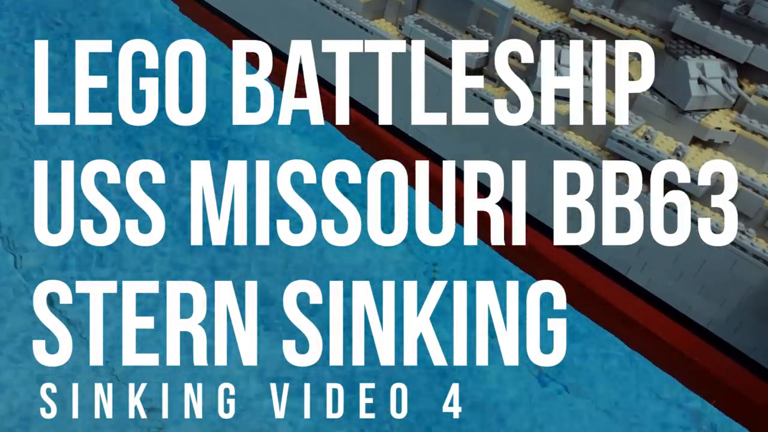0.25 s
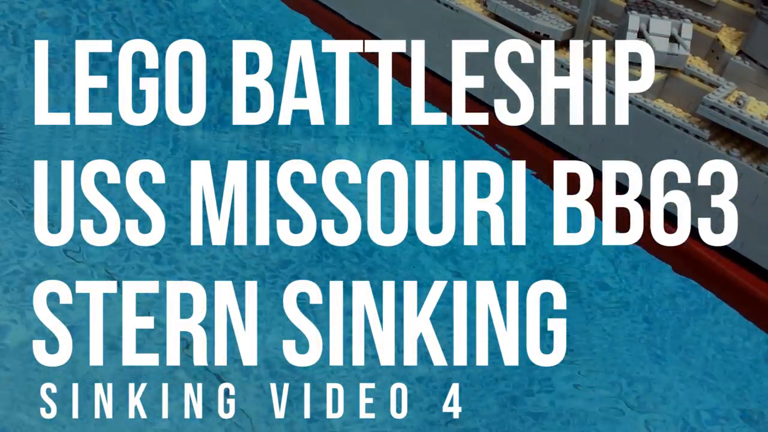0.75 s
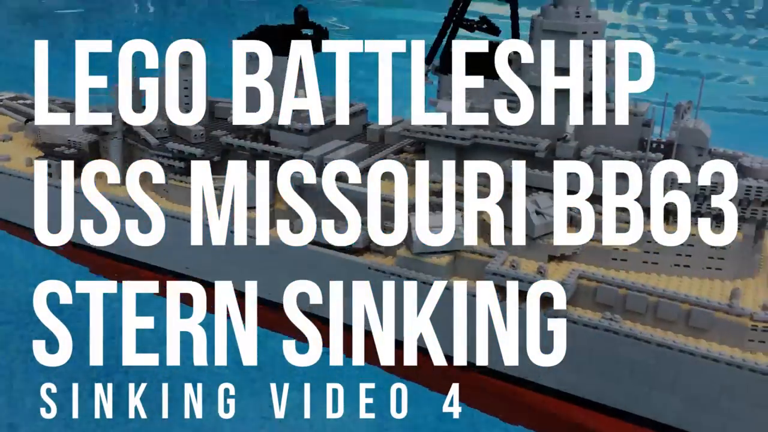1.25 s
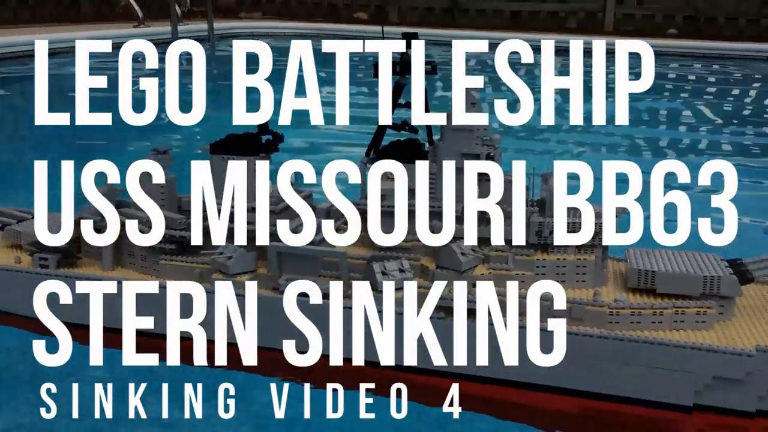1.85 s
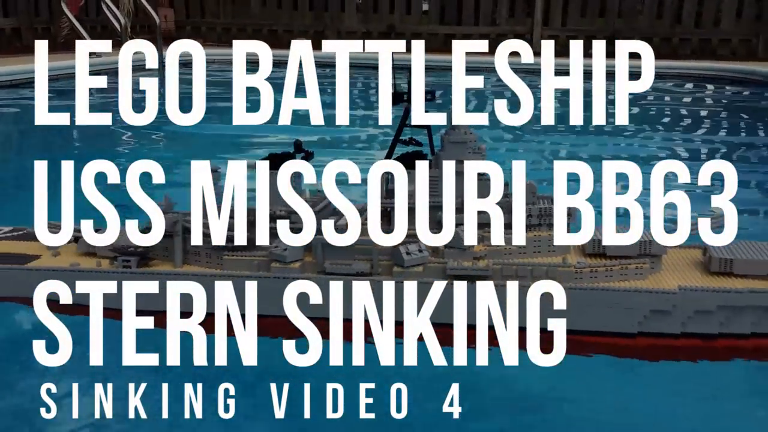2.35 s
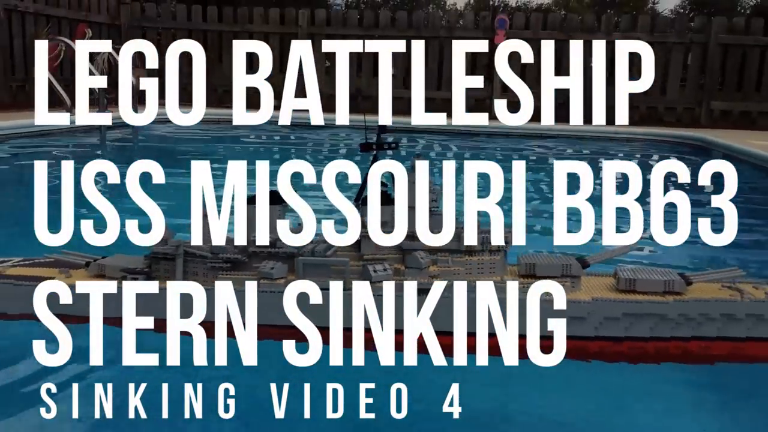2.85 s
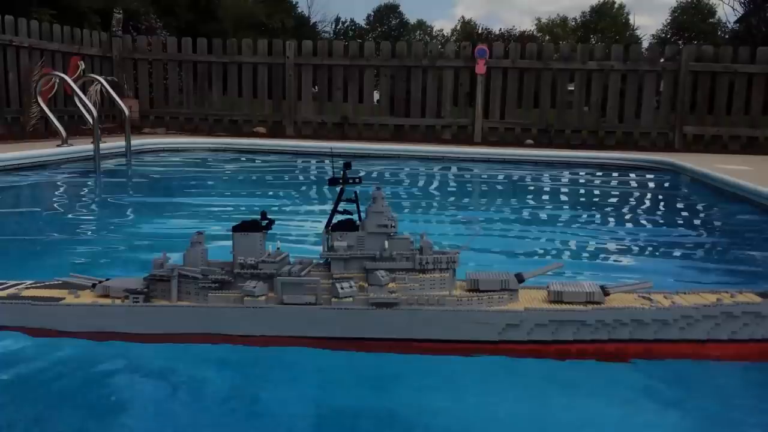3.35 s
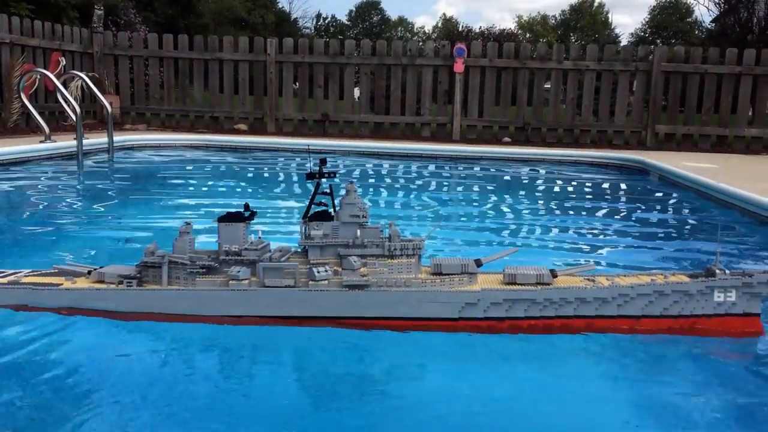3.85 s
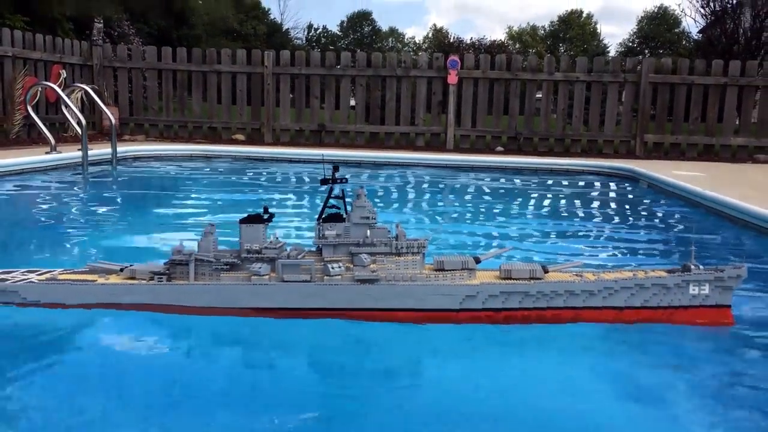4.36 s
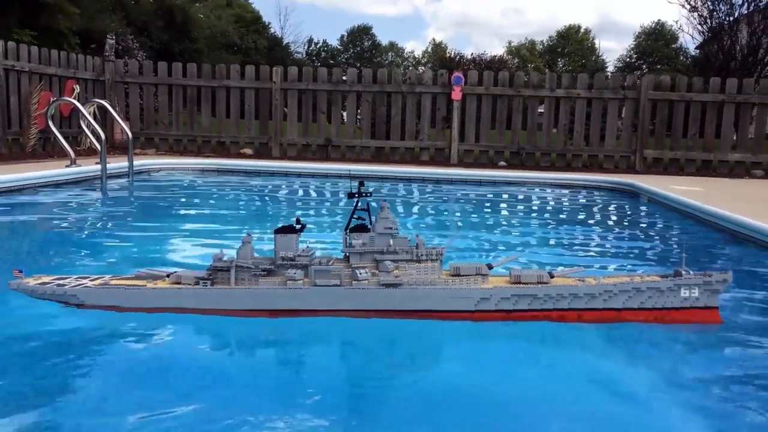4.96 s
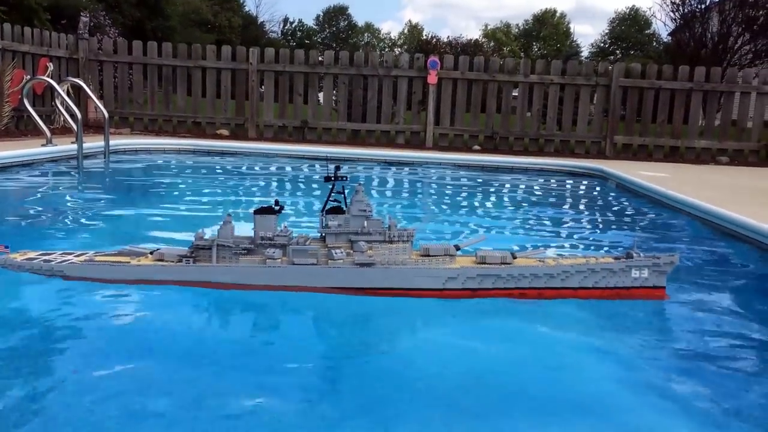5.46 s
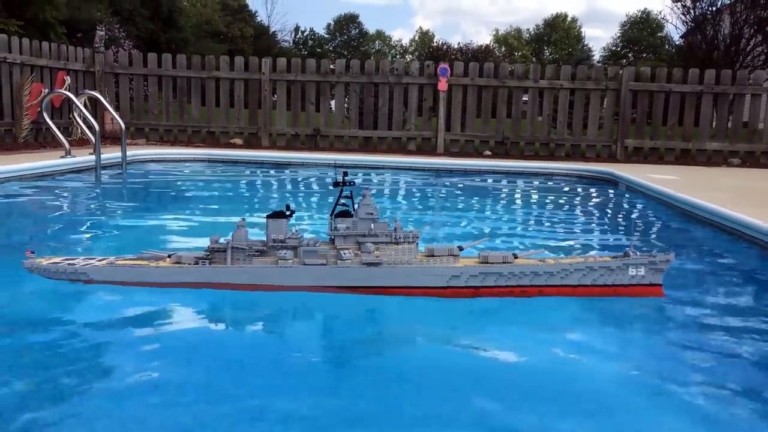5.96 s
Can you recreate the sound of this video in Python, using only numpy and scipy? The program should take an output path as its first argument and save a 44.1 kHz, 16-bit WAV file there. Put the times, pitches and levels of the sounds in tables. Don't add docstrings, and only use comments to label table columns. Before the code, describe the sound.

Outdoors at a garden pool, a low pump drone wavers over soft rumble and a faint steady insect hiss. A few small watery blips come first, then over a second of near calm. Water suddenly slops against a floating model hull in a dense cluster of bright plops, gurgles, little slaps and droplet ticks. It thins into separate drips, with a last small plop near the end. The microphone is close to the water, with little echo.

```python
import sys
import numpy as np
from scipy import signal
from scipy.fft import rfft, irfft, next_fast_len
from scipy.io import wavfile
from scipy.ndimage import map_coordinates

SR = 44100
rng = np.random.default_rng(int(sys.argv[2]) if len(sys.argv) > 2 else 0)


def digitize_waveform(pressure):
    field = np.atleast_2d(pressure).T
    bounded = np.clip(field, -1, 1)
    quanta = np.round(bounded * 32767).astype(np.int16)
    wavfile.write(sys.argv[1], SR, quanta)


def to_linear_factor(level_db):
    exponent = np.asarray(level_db, float) / 20
    return 10 ** exponent


N = 273861

# frequency_hz, density_db
RUMBLE_SPECTRUM = [(15, -70), (25, -24), (50, -10.5), (78, -3), (130, -6), (200, -10.5), (280, -21.5),
                   (420, -30.5), (800, -34.5), (1450, -37), (2300, -43), (2900, -54), (4000, -106)]
# frequency_hz, density_db
INSECT_SPECTRUM = [(1710, -39.5), (2900, -11), (3660, -6.5), (4210, -6.5), (4610, -4), (5190, -5),
                   (6820, -0.5), (11400, -23), (14500, -27.5), (15500, -21)]
# time_s, level_db
PUMP_LEVEL = [(0.0, -48), (0.34, -55), (1.03, -53), (1.38, -62.5), (1.72, -46.5), (2.12, -58),
              (2.35, -47.5), (2.76, -48), (3.1, -47.5), (3.8, -59), (4.48, -56.5), (4.83, -47),
              (5.18, -45.5), (5.52, -51.5), (5.86, -48), (6.21, -53)]
# peak_s, small_bubbles_db, spray_db
SLOSHES = [(0.18, -71, -76), (0.3, -67.5, -82), (2.08, -70.5, -75), (2.29, -56.5, -86), (2.46, -55.5, -72),
           (2.56, -49, -67), (2.63, -50.5, -69), (2.71, -55.5, -66), (2.85, -52.5, -65), (2.98, -63, -71),
           (3.08, -61, -68), (3.19, -61, -74), (3.26, -63, -64), (3.5, -65, -77), (3.74, -60, -76),
           (3.84, -68, -70), (4.8, -72, -78)]
# frequency_hz, level_db
FIZZ_SPECTRUM = [(350, -17), (600, -13), (1000, -4.5), (1400, -0.5), (2300, -3), (2900, -13.5), (4200, -10),
                 (6000, -22.5)]
# start_s, peak_db
SPECKS = [(0.5467, -55), (0.7382, -57), (0.7612, -58), (0.8295, -62), (0.9133, -56), (0.9443, -56),
          (2.0213, -59), (2.0264, -59), (2.0692, -57), (2.1046, -57), (2.1734, -52), (2.2054, -60),
          (2.2914, -58), (2.3074, -58), (2.4209, -55), (2.4374, -54), (2.5147, -50), (2.553, -54),
          (2.5686, -52), (2.592, -53), (2.6126, -52), (2.643, -54), (2.716, -54), (2.731, -54),
          (2.7501, -53), (2.77, -55), (2.826, -49), (2.9174, -50), (3.0505, -55), (3.0694, -54),
          (3.1587, -55), (3.2261, -52), (3.2664, -56), (3.3044, -57), (3.3263, -54), (3.3493, -59),
          (3.4271, -58), (3.5094, -60), (3.52, -62), (3.6511, -56), (3.7209, -53), (3.7294, -54),
          (3.7753, -49), (3.8014, -58), (3.8192, -57), (3.8771, -54), (3.8864, -57), (3.902, -59),
          (4.1729, -60), (4.2278, -56), (4.4737, -62), (4.558, -54), (4.8244, -60), (4.9337, -62),
          (5.034, -58)]
# start_s, peak_db, pitch_hz
PIPS = [(4.805, -53, 4300), (4.822, -54, 4050), (3.195, -51, 4200), (0.548, -52, 4000), (0.74, -56, 3900),
        (0.32, -51, 4000), (2.174, -50, 4200), (2.294, -46, 6670), (2.306, -49, 3670), (2.381, -50, 4900),
        (2.434, -47, 4300), (2.526, -39, 6060), (2.618, -47, 4570), (2.66, -56, 4300), (2.671, -41, 5100),
        (2.746, -49, 3600), (2.836, -43, 3800), (2.8823, -45, 5260), (3.009, -48, 4000), (3.051, -50, 3800),
        (3.134, -51, 3740), (3.149, -48, 4400), (3.271, -48, 4400), (3.29, -48, 5800), (3.304, -56, 4200),
        (3.323, -54, 4100), (3.7294, -44, 5430), (3.802, -49, 4930), (3.88, -48, 6640)]
# start_s, peak_db, lower_half_re_top_db
TICKS = [(0.199, -46.5, -8), (2.074, -48, -3), (2.165, -49, -12), (2.2987, -55, 5), (2.3622, -51, 7),
         (2.526, -49.5, 4), (2.5455, -51, 5), (2.621, -40.5, 1), (2.6287, -32.5, -7.5), (2.6703, -52, 3),
         (2.6835, -42, -2), (2.6952, -38, -6), (2.8368, -47, 4), (2.8443, -36, -10), (2.8524, -36, -20),
         (2.883, -41, -4), (2.9047, -28, -12), (2.9312, -45, -8), (2.9903, -47, -5), (3.1138, -49, -5),
         (3.2595, -54, 3), (3.297, -47, -3), (3.6034, -46.5, -9), (3.709, -54.5, 8.5), (3.754, -41.5, -6),
         (3.7853, -39, -11), (4.4972, -48, -15), (4.5662, -48, -8), (5.0446, -46.5, -3), (5.3776, -47, -6)]
# start_s, peak_db
SLAPS = [(0.177, -49), (0.253, -47), (0.291, -50), (0.547, -50), (0.739, -49), (2.142, -49), (2.248, -48),
         (2.42, -44), (2.456, -43), (2.52, -42), (2.542, -33), (2.581, -35), (2.602, -36), (2.616, -36),
         (2.626, -38), (2.644, -37), (2.696, -31), (2.745, -46), (2.767, -39), (3.061, -39), (3.133, -43),
         (3.196, -38), (3.739, -39), (3.751, -36), (3.856, -46)]
# start_s, peak_db, from_hz, to_hz, length_ms
FILLING = [
    (0.15, -58, 650, 1050, 48),
    (0.24, -57, 590, 1000, 54),
    (0.173, -57, 1450, 2300, 20),
    (0.292, -57, 1900, 2550, 12),
    (2.195, -60, 680, 1100, 90),
    (2.652, -36.5, 880, 2000, 31),
    (2.568, -36, 450, 850, 22),
    (2.548, -43, 950, 1350, 26),
    (2.59, -46, 570, 600, 70),
    (3.362, -60, 1600, 2400, 14),
]
# start_s, peak_db, pitch_hz, t60_ms
RISING = [(3.2, -38, 1320, 45), (3.298, -51, 1600, 25), (3.27, -53, 1480, 60), (2.612, -41, 1950, 40),
          (2.625, -43, 1750, 40), (0.1915, -47, 1330, 70), (0.205, -56, 1380, 90), (2.732, -48, 1250, 30),
          (2.925, -50, 1120, 80), (0.1181, -52, 636, 170), (0.1985, -48, 548, 240),
          (2.193, -41.5, 1710, 30), (2.269, -49, 1220, 56), (2.2872, -38, 1330, 9),
          (2.513, -47.5, 478, 260), (2.568, -40, 4350, 18), (2.569, -33, 1344, 73), (2.569, -30, 1500, 10),
          (2.6172, -29, 1470, 6.5), (2.768, -43, 2000, 12), (2.8166, -46, 1770, 22),
          (2.8768, -39, 1560, 53), (3.1074, -55, 606, 90), (3.112, -54, 860, 70), (3.3723, -52, 1140, 110),
          (3.399, -48.5, 950, 84), (3.527, -55, 1840, 21), (3.5287, -52.5, 980, 65), (3.588, -57, 1580, 56),
          (3.698, -53, 1124, 100), (3.7863, -37.5, 2180, 7.7), (3.841, -54, 2350, 45),
          (3.856, -49.5, 1286, 64), (3.8778, -38, 1330, 4.5), (4.7718, -49, 1300, 47),
          (4.824, -55, 990, 52), (4.9352, -58, 1750, 53), (5.0451, -39, 1900, 5.5)]
# start_s, peak_db, pitch_hz, t60_ms
SINKING = [(0.0, -43, 1580, 17), (0.097, -51, 1180, 29), (0.5471, -45, 3300, 7), (0.7395, -54, 2000, 12),
           (2.069, -49, 3930, 7), (2.161, -46, 1440, 44), (2.1743, -29, 1450, 5.2), (2.5712, -38, 580, 17),
           (2.5886, -44, 640, 60), (2.7039, -43.5, 530, 180), (2.7302, -39.5, 4350, 11),
           (2.7672, -43, 768, 63), (2.852, -33.5, 455, 125), (2.965, -50, 437, 89),
           (3.022, -36.5, 1926, 50), (3.2284, -38.5, 3980, 14), (3.244, -56.5, 510, 260),
           (3.2564, -44.5, 2220, 30), (3.2595, -42, 4200, 16), (3.3761, -51, 4250, 14),
           (3.3763, -47, 2680, 35), (3.4276, -38.5, 880, 51), (3.7098, -43, 4370, 12),
           (3.72, -46, 2240, 26), (3.8224, -51, 2010, 11), (4.446, -52.5, 1730, 27),
           (4.7644, -51.5, 950, 67), (4.832, -52, 1380, 45)]
# start_s, peak_db, pitch_hz, t60_ms
STEADY = [(0.004, -62, 1410, 54), (0.095, -56, 1520, 34), (0.5475, -59, 1750, 9), (0.548, -54.5, 2440, 14),
          (0.7396, -56, 2930, 24), (1.962, -59.5, 1460, 98), (2.194, -54.5, 843, 130),
          (2.2947, -44, 2400, 30), (2.345, -44, 1980, 40), (2.196, -51, 1300, 45), (2.278, -48, 1700, 45),
          (2.455, -45, 1340, 30), (2.66, -39, 2000, 25), (2.71, -42, 1930, 25), (2.858, -48, 1170, 45),
          (2.862, -42, 1450, 40), (3.13, -49.5, 1006, 70), (3.57, -59.5, 515, 120),
          (3.605, -56.5, 562, 120), (3.76, -52, 982, 110), (3.795, -53, 930, 62), (3.715, -57, 714, 83),
          (2.585, -37, 1450, 35), (2.63, -45, 1196, 70), (2.582, -41, 2400, 30), (2.421, -48.5, 566, 120),
          (2.453, -49, 760, 69), (2.891, -42, 2360, 42), (2.9035, -46, 2440, 36), (2.962, -54, 723, 99),
          (2.9913, -40, 2330, 25), (3.076, -46, 270, 68), (3.133, -35.5, 1520, 24), (3.7399, -39, 1090, 43),
          (3.748, -50, 690, 110), (3.8002, -53, 1910, 32), (3.8282, -51, 1790, 34), (3.8776, -39, 551, 205),
          (3.921, -54, 2070, 21), (4.7686, -46.5, 2250, 19), (4.823, -54, 1890, 35), (4.795, -51, 4130, 15),
          (5.043, -49, 3800, 10), (5.0454, -35.5, 1195, 73), (5.1544, -45, 1917, 44)]
# start_s, peak_db, pitch_hz, t60_ms, glide_octaves_per_s
SWEEPS = [(0.115, -50, 620, 15, 79), (0.175, -54, 720, 40, 5), (0.254, -52, 1060, 48, -44),
          (0.262, -57, 640, 68, 19), (0.292, -61, 847, 190, 8.5), (2.136, -62, 986, 450, 17.5),
          (2.285, -40, 1100, 110, 5), (2.325, -47, 1330, 60, 14), (2.344, -37, 1440, 70, 8),
          (2.362, -46, 1580, 60, 8), (2.543, -36, 1166, 43, -16), (2.5807, -36, 1950, 35, 12),
          (2.512, -48, 600, 98, 48), (2.7, -39, 1250, 67, 2.5), (2.602, -33.5, 1500, 68, -9),
          (2.6049, -30, 1970, 19, -74), (2.6695, -27.5, 2200, 30, 21.5), (2.68, -44, 2560, 40, 20),
          (2.694, -38, 2750, 30, -10), (2.878, -40, 1600, 30, 5), (3.058, -43, 380, 40, 10),
          (2.6976, -25.5, 1610, 15, -74), (2.8229, -41, 1810, 31, 43), (2.83, -37, 2064, 42, -20),
          (2.8396, -37.5, 2040, 60, -17), (2.8443, -32, 1250, 26, -83), (3.061, -40.5, 518, 66, -47),
          (3.0644, -43, 1190, 33, -42), (3.063, -44, 553, 68, 74.5), (3.073, -43, 1240, 30, 20),
          (2.177, -42, 1190, 47, 22), (3.092, -56, 515, 120, 18), (2.322, -51, 2300, 40, 15),
          (3.222, -44.5, 5200, 28, -45)]
# start_s, peak_db, pitch_hz
TRICKLE = [(0.121, -58, 1210), (0.124, -53, 2700), (0.2985, -57, 2200), (1.103, -60.5, 548),
           (1.162, -61, 704), (2.097, -58, 2520), (2.133, -55, 2350), (2.131, -56, 1020),
           (2.725, -43, 4820), (2.8, -44, 4120), (2.99, -47, 1310), (3.173, -50, 3900), (3.255, -55, 1400),
           (3.289, -51, 1490), (3.32, -58, 1360), (3.365, -55, 2850), (3.445, -54, 2540),
           (3.455, -52.5, 1240), (3.512, -58, 1640), (3.5505, -58, 2040), (3.63, -58, 1690),
           (3.664, -59, 1900), (3.713, -55, 2400), (3.718, -53, 890), (3.77, -57, 1050), (4.847, -60, 1850),
           (4.9478, -56, 2490), (5.4, -60, 1600), (2.05, -61, 1000), (2.063, -62, 1650), (2.08, -59, 2150),
           (2.086, -58, 1150), (2.4, -53, 1250), (3.015, -54, 880), (3.235, -54, 1460), (3.81, -58, 1440),
           (3.44, -57, 1900), (4.75, -61, 1850), (4.89, -62, 1900), (5.315, -61, 2500), (0.32, -59, 895),
           (0.335, -61, 1050)]
# start_s, peak_db, pitch_hz, glide_octaves_per_s
SWELLS = [(0.067, -49, 2290, -55), (0.1913, -53, 1015, -32), (0.2535, -49.5, 1920, 37),
          (0.2974, -51.5, 1190, -24), (2.216, -37.5, 1820, -43), (2.312, -39, 1170, 20),
          (2.314, -47, 1800, 15), (2.384, -43.5, 2790, -13), (2.424, -38.5, 1640, 5),
          (2.432, -35, 1850, 35), (2.4698, -26, 1670, -69), (2.527, -33, 1700, 4), (2.541, -33, 2114, 20),
          (2.548, -41, 3700, 25), (2.633, -42, 1420, -39), (2.817, -36.5, 1400, -21),
          (2.9129, -38.5, 1400, 24), (3.1975, -32.5, 1410, -9), (3.191, -43, 1600, -10),
          (3.205, -46, 1950, 0.5), (3.263, -43.5, 2480, 25), (3.2718, -42, 2520, -22),
          (3.356, -51, 1360, 29), (3.478, -36, 2365, 7), (3.7476, -39, 2080, -104),
          (5.0415, -43.5, 2320, 36)]

DRONE_HZ, DRONE_WIDTH_HZ = 103.9, 5.04
BEAT_HZ, BEAT_DEPTH, BEAT_PEAK_S = 4.8, 0.31, 2.35
GATHER_DB_PER_S, SETTLE_DB_PER_S = 137, 102
THROW_DB_PER_S, FALL_DB_PER_S = 150, 108
FILL_CURVE = 1.5
RISE_OCTAVES, SAG_OCTAVES = 0.47, -0.49
ONSET_CYCLES = 0.75
SWEEP_ONSET_SHARE = 0.011
SWELL_ONSET_S = 0.004
PIP_CYCLES, SWELL_CYCLES, TRICKLE_CYCLES = 27, 30, 53
WOBBLE_DB, WOBBLE_PER_S = 1.2, 140


def rms_one(x):
    return x / np.sqrt(np.mean(x ** 2) + 1e-20)


def at_hz(points, hz):
    points_hz, points_db = np.transpose(points)
    return np.interp(np.log(hz), np.log(points_hz), points_db)


def drift(rate_per_s):
    steps = rng.standard_normal(int(rate_per_s * N / SR) + 3)
    position = np.arange(N) * rate_per_s / SR
    return rms_one(map_coordinates(steps, [position], order=3))


def coloured(spectrum):
    size = next_fast_len(N)
    hz = np.arange(size // 2 + 1) * SR / size + 1
    white = rfft(rng.standard_normal(size))
    return rms_one(irfft(white * to_linear_factor(at_hz(spectrum, hz)), size)[:N])


def add(out, start_s, sound):
    i = round(start_s * SR)
    out[i:i + len(sound)] += sound[:N - i]


def stirred(peaks, up_db_per_s, down_db_per_s):
    t = np.arange(N) / SR
    power = np.zeros(N)
    for peak_s, db in peaks:
        below_peak_db = np.maximum(up_db_per_s * (peak_s - t), down_db_per_s * (t - peak_s))
        power += to_linear_factor(db - below_peak_db) ** 2
    return 10 * np.log10(power + 1e-12)


def crack(low_hz, high_hz, t60_s):
    t = np.arange(round(0.012 * SR)) / SR
    burst = rng.standard_normal(len(t)) * to_linear_factor(-60 * t / t60_s)
    band = signal.butter(2, [low_hz, high_hz], "band", fs=SR, output="sos")
    burst = signal.sosfilt(band, burst)
    return burst / np.abs(burst).max()


def bubble(hz, glide, t60_s, rise_s):
    t = np.arange(round(t60_s * SR) + 64) / SR
    glide_end_s = t60_s * 3 / np.log(1000)
    pitch = hz * 2 ** (glide * np.minimum(t, glide_end_s))
    shape = (1 - np.exp(-t / rise_s)) * to_linear_factor(-60 * t / t60_s)
    return shape / shape.max() * np.sin(2 * np.pi * np.cumsum(pitch) / SR)


def rumble():
    gusts_db = 0.6 * drift(4)
    return to_linear_factor(-50 + gusts_db) * coloured(RUMBLE_SPECTRUM)


def insects():
    fading_db = np.linspace(-59, -60, N)
    return to_linear_factor(fading_db + 0.43 * drift(7.2)) * coloured(INSECT_SPECTRUM)


def pump():
    t = np.arange(N) / SR
    level_db = np.interp(t, *np.transpose(PUMP_LEVEL))
    wander_hz = DRONE_WIDTH_HZ * 0.3025 * drift(6)
    tone = np.sqrt(2) * np.sin(2 * np.pi * np.cumsum(DRONE_HZ + wander_hz) / SR)
    beat = 1 + BEAT_DEPTH * np.cos(2 * np.pi * BEAT_HZ * (t - BEAT_PEAK_S))
    return to_linear_factor(level_db - 1.0 + 1.4 * drift(9)) * beat * tone


def reflections(x):
    t = np.arange(round(0.1 * SR)) / SR
    tail = rng.standard_normal(len(t)) * to_linear_factor(-60 * t / 0.08) * np.clip(t / 0.004, 0, 1)
    band = signal.butter(1, [900, 5000], "band", fs=SR, output="sos")
    tail = signal.sosfilt(band, tail)
    return to_linear_factor(-16) * signal.fftconvolve(x, tail / np.linalg.norm(tail))[:N]


def spray(level_db, count=2600):
    out = np.zeros(N)
    for when, size, pitch in rng.random((count, 3)):
        hz = 4200 * 3.4 ** pitch
        db = -4.5 * np.log(size + 0.04)
        add(out, when * N / SR, to_linear_factor(db) * bubble(hz, 0, 20 / hz, 1.2 / hz))
    mist = coloured([(3000, -36), (5000, -4), (9000, -4), (14000, -9), (16000, -16)])
    clumps_db = 4.0 * drift(90)
    return to_linear_factor(level_db + clumps_db) * (rms_one(out) + to_linear_factor(-17) * mist)


def wash(level_db):
    return to_linear_factor(level_db - 3.0 + 5.9 * drift(60)) * coloured(FIZZ_SPECTRUM)


def fizz(level_db, count=4000):
    out = np.zeros(N)
    for when, size, pitch, bend, cycles in rng.random((count, 5)):
        hz = 350 * 16.0 ** pitch
        db = at_hz(FIZZ_SPECTRUM, hz) - 4.4 * np.log(size + 0.072)
        glide = hz * (0.0273 * bend - 0.008)
        add(out, when * N / SR, to_linear_factor(db) * bubble(hz, glide, (14 + 45 * cycles) / hz, 1.6 / hz))
    return to_linear_factor(level_db - 1.5) * rms_one(out)


def specks():
    out = np.zeros(N)
    for s, db in SPECKS:
        add(out, s, to_linear_factor(db + 1.5) * crack(9500, 14500, t60_s=0.007))
    for s, db, hz in PIPS:
        add(out, s, to_linear_factor(db) * bubble(hz, 0, PIP_CYCLES / hz, 1.5 / hz))
    return out


def ticks():
    out = np.zeros(N)
    for s, db, lower_db in TICKS:
        top = crack(8400, 13600, t60_s=0.007)
        lower = crack(3500, 7500, t60_s=0.009)
        add(out, s, to_linear_factor(db - 2.8) * top + to_linear_factor(db + lower_db + 7.5) * lower)
    return out


def slaps():
    out = np.zeros(N)
    for s, db in SLAPS:
        add(out, s, to_linear_factor(db - 2.5) * crack(700, 2700, t60_s=0.024))
    dull = signal.butter(4, 2500, fs=SR, output="sos")
    return signal.sosfilt(dull, out + 1e-18)


def filling():
    out = np.zeros(N)
    for s, db, from_hz, to_hz, length_ms in FILLING:
        share = np.linspace(0, 1, round(length_ms * SR / 1000))
        pitch = from_hz * (to_hz / from_hz) ** (share ** FILL_CURVE)
        tone = np.sin(2 * np.pi * np.cumsum(pitch) / SR)
        add(out, s, to_linear_factor(db) * np.sin(np.pi * share) * tone)
    return out


def bubbles():
    out = np.zeros(N)
    for table, octaves in ((RISING, RISE_OCTAVES), (SINKING, SAG_OCTAVES), (STEADY, 0)):
        for s, db, hz, t60_ms in table:
            glide = octaves * 1000 / t60_ms
            add(out, s, to_linear_factor(db) * bubble(hz, glide, t60_ms / 1000, ONSET_CYCLES / hz))
    for s, db, hz, t60_ms, glide in SWEEPS:
        t60_s = t60_ms / 1000
        add(out, s, to_linear_factor(db) * bubble(hz, glide, t60_s, SWEEP_ONSET_SHARE * t60_s))
    for s, db, hz in TRICKLE:
        t60_s = TRICKLE_CYCLES / hz
        add(out, s, to_linear_factor(db) * bubble(hz, RISE_OCTAVES / t60_s, t60_s, ONSET_CYCLES / hz))
    for s, db, hz, glide in SWELLS:
        add(out, s, to_linear_factor(db) * bubble(hz, glide, SWELL_CYCLES / hz, SWELL_ONSET_S))
    return out


def scene():
    background = rumble() + insects() + pump()
    peak_s, bubbles_db, spray_db = np.transpose(SLOSHES)
    churn_db = stirred(zip(peak_s, bubbles_db), GATHER_DB_PER_S, SETTLE_DB_PER_S)
    thrown_db = stirred(zip(peak_s, spray_db), THROW_DB_PER_S, FALL_DB_PER_S)
    water = spray(thrown_db) + wash(churn_db) + fizz(churn_db)
    water += specks() + ticks() + slaps()
    wobble_db = WOBBLE_DB * drift(WOBBLE_PER_S) - 0.5
    water += to_linear_factor(wobble_db) * (filling() + bubbles())
    return (background + water + reflections(water))[None]


def band_limit(x):
    return signal.sosfilt(signal.butter(12, 15560, fs=SR, output="sos"), x)


def record(dry):
    dip = signal.lfilter(*signal.iirpeak(2900, 5.0, fs=SR), dry)
    roll_off = signal.cheby2(8, 45, 16000, fs=SR, output="sos")
    mix = signal.sosfilt(roll_off, dry - 0.4 * dip)
    return band_limit(mix)


dry = scene()
out = record(dry)
digitize_waveform(out)
```